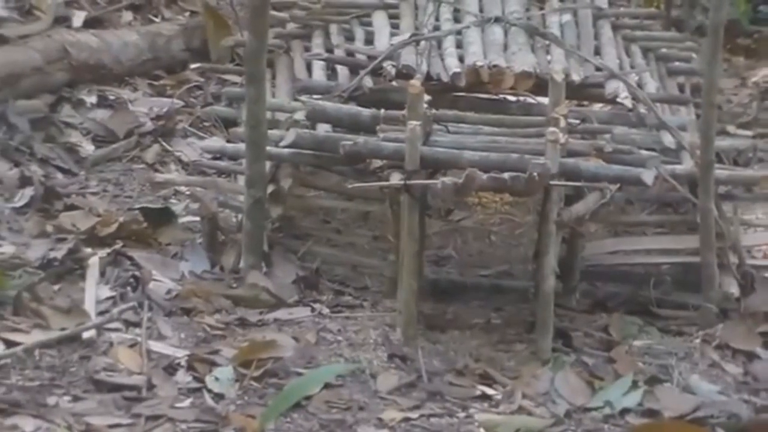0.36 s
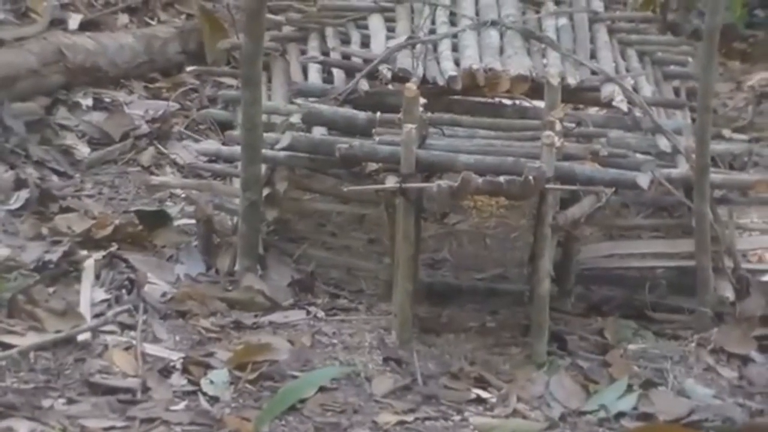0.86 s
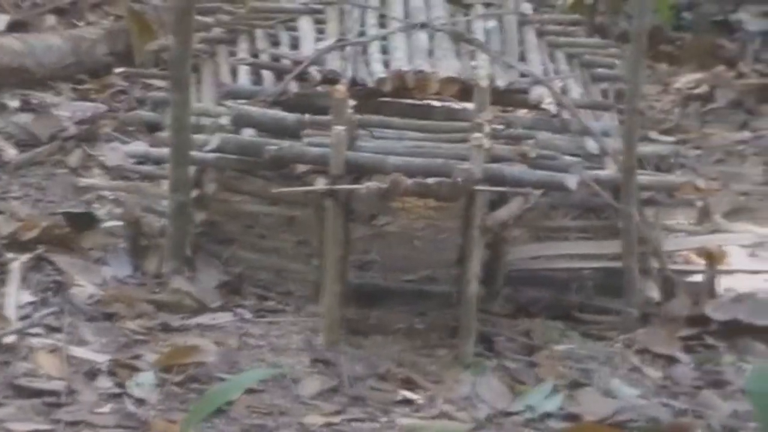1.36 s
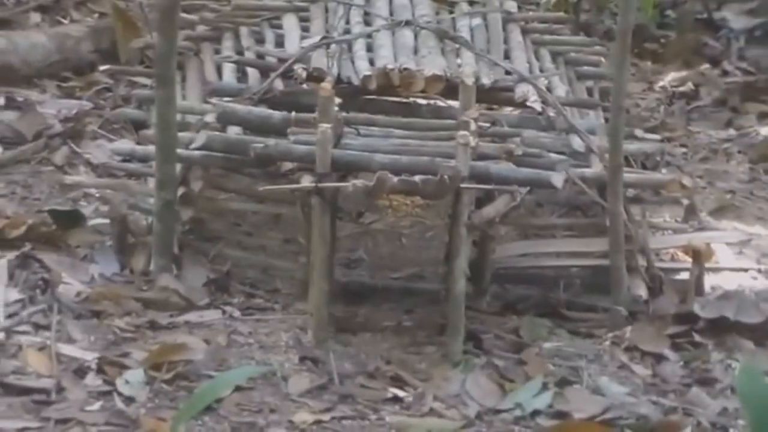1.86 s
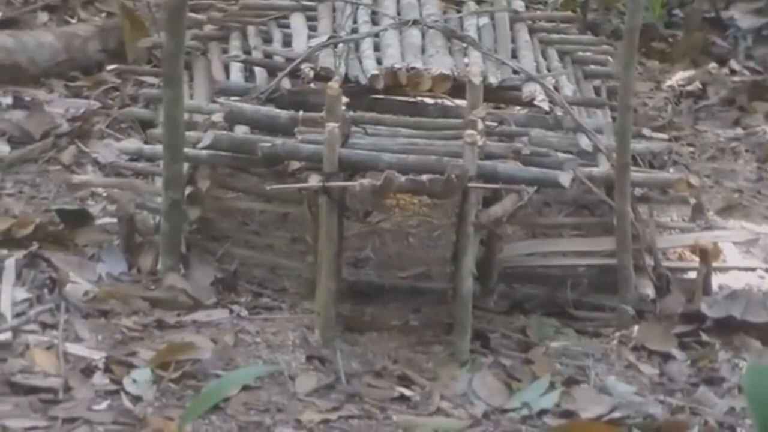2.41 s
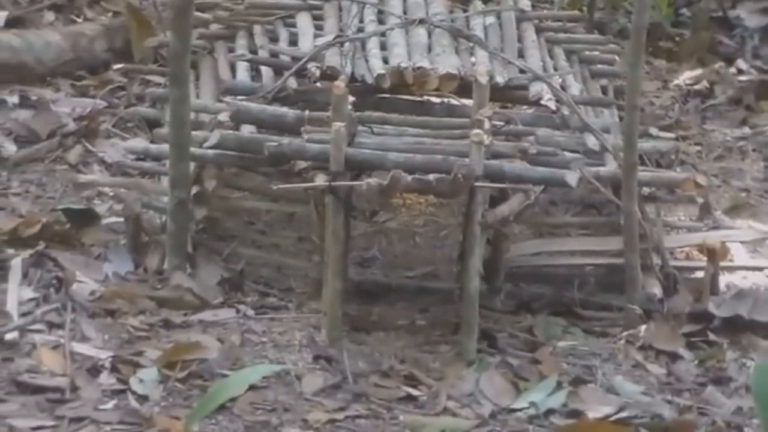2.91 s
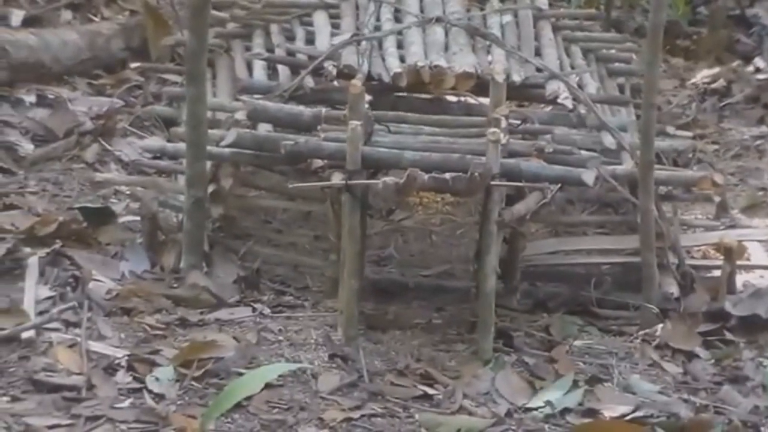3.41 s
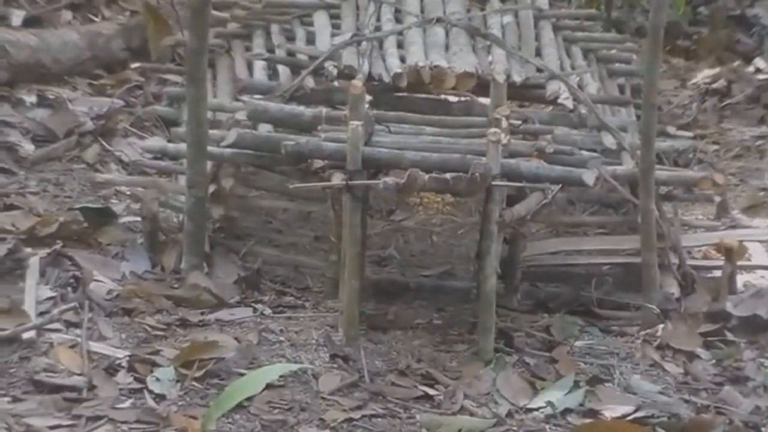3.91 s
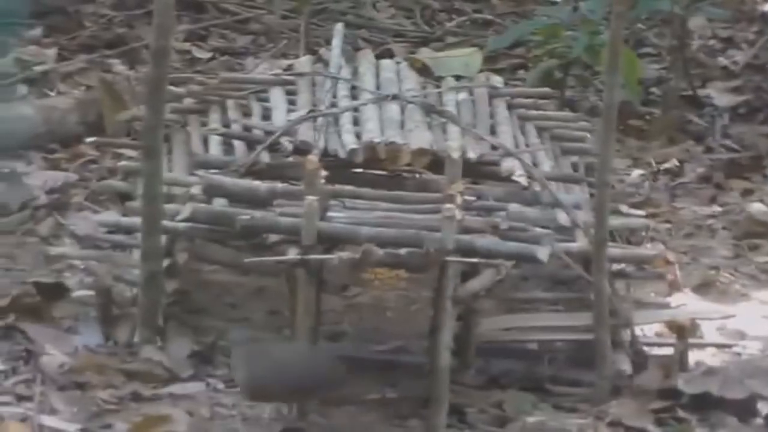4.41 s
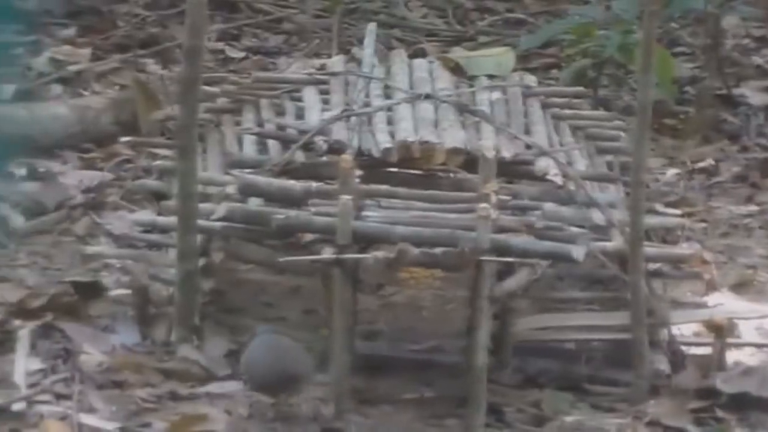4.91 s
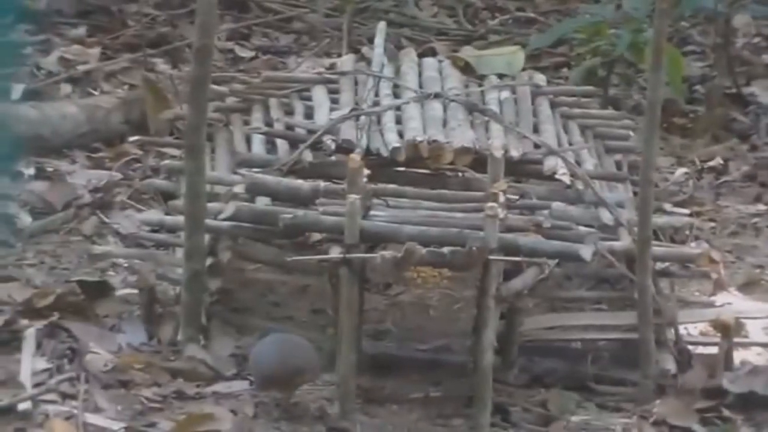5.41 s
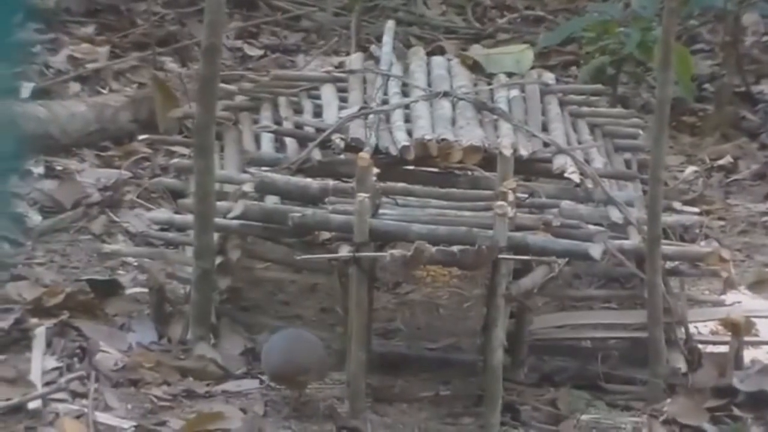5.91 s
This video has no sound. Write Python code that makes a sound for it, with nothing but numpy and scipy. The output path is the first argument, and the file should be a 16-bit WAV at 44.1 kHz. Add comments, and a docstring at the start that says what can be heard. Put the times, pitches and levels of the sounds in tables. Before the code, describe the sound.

A far crowd of cicadas drones steadily at high pitch over airy hiss, with thin cricket trills. Close to the microphone, mostly to the left, a plastic case creaks and snaps in clusters around one and a half to two seconds. Past four seconds a bright click cuts to a louder forest, followed by a hard catch-like clack and scattered dry ticks.

```python
"""A plastic camera case creaks and snaps close to the left port: each blow rings damped modes.
Behind it a far cicada chorus drones as a crowd of clicking drums; crickets and a katydid trill in click trains
over filtered hiss and a wavering low hum. Small dry ticks sound as short resonant bursts.
A splice clicks, and after it the forest is louder."""
import sys
import numpy as np
from scipy import signal
from scipy.fft import rfft, irfft, next_fast_len
from scipy.io import wavfile
from scipy.ndimage import uniform_filter1d, map_coordinates

SR = 44100
rng = np.random.default_rng(int(sys.argv[2]) if len(sys.argv) > 2 else 0)


def master_out(mix):
    """Clip the mix to full scale and print it as 16-bit PCM to the path in sys.argv[1]."""
    frames = np.transpose(np.atleast_2d(mix))
    ceiling = np.clip(frames, -1, 1)
    pcm = np.round(ceiling * 32767).astype(np.int16)
    wavfile.write(sys.argv[1], SR, pcm)


def convert_level_to_amplitude(level_db):
    """Map a level in decibels to its linear amplitude factor."""
    exponent = np.asarray(level_db, float) / 20
    return 10 ** exponent


N = 265967
TIME = np.arange(N) / SR  # s
SPLICE_S = 4.3985
LATE = np.arange(N) >= SPLICE_S * SR  # samples after the splice
OPPOSITE = np.array([[1], [-1]])  # opposite signs at the two ports


def unit(x):
    """Normalisation: scales a signal to rms 1."""
    return x / np.sqrt(np.mean(x ** 2) + 1e-20)


def along(points, hz):
    """Logarithmic frequency scale: interpolates (Hz, value) points."""
    f, v = np.transpose(points)
    return np.interp(np.log(hz + 1), np.log(f + 1), v)


def curve(rows):
    """Linear interpolation: (s, value) rows as one value per sample."""
    return np.interp(TIME, *np.transpose(rows))


def wobble(rate):
    """Slow random modulation: a smooth curve through random knots, rate knots a second."""
    return map_coordinates(rng.standard_normal(int(N * rate / SR) + 4), [np.arange(N) * rate / SR])


def filtered(x, response):
    """Linear filtering: the spectrum of x times a complex response of frequency."""
    m = next_fast_len(x.shape[-1] + 8192)
    spectrum = rfft(x, m) * response(np.fft.rfftfreq(m, 1 / SR))
    return irfft(spectrum, m)[..., :x.shape[-1]]


def ring(hz, centre_hz, width_hz):
    """Resonance: the bandpass response of one damped oscillator."""
    return 1j * hz * width_hz / (centre_hz ** 2 - hz ** 2 + 1j * hz * width_hz)


def add(track, s, sound):
    """Superposition: mixes a stereo sound in at s seconds."""
    k = round(s * SR)
    track[:, k:k + sound.shape[1]] += sound


def clicks(rate, jitter_s, scatter_db):
    """Pulse train: rate clicks a second at each sample, uneven in time and size."""
    at = np.flatnonzero(np.diff(np.floor(np.cumsum(rate) / SR)))
    draw = rng.standard_normal((len(at), 2))
    shift = np.round(jitter_s * SR * draw[:, 0]).astype(int)
    at = np.clip(at + shift, 0, N - 1)
    return np.bincount(at, convert_level_to_amplitude(scatter_db * draw[:, 1]), N)


def foliage(x, t60, wet):
    """Multiple scattering: direct sound plus a separate decaying noise tail for each port."""
    t = np.arange(SR // 2) / SR
    tail = rng.standard_normal((2, len(t))) * convert_level_to_amplitude(-60 * t / t60)
    wet = np.clip(wet, 0, 1)
    scattered = signal.fftconvolve(x[None], tail / np.linalg.norm(tail[0]), axes=1)[:, :N]
    return np.sqrt(1 - wet) * x + np.sqrt(wet) * scattered


def hum():
    """Phase and amplitude modulation: a faint 30 Hz tone wavers, a little differently at each port."""
    apart = 0.57 * wobble(5) * OPPOSITE
    phase = 2 * np.pi * 30 * TIME + 0.32 * wobble(2.76) + apart
    return convert_level_to_amplitude(-57.5 + 1.65 * wobble(6.19)) * np.sqrt(2) * np.sin(phase)


def patchy(x, patch_db):
    """Time-frequency modulation: small random patches of gain."""
    z = signal.stft(x, nperseg=1024)[2]
    field = rng.standard_normal(z.shape[1:])
    field = uniform_filter1d(uniform_filter1d(field, size=5, axis=0), size=4, axis=1)
    return signal.istft(z * convert_level_to_amplitude(patch_db * unit(field)), nperseg=1024)[1][:, :N]


# Hiss of air, leaves and microphone before and after the splice.
# Each row: frequency in Hz, relative spectral density in dB.
HISS_BEFORE = [(8, -2), (20, -2.5), (45, -2), (70, -6.5), (130, -11.5), (250, -14.5), (600, -19),
               (1500, -23), (3000, -23), (5000, -26), (8000, -29), (12000, -33), (15000, -37.5)]
HISS_AFTER = [(8, -4), (20, -10), (45, -5), (70, -2.5), (130, -9), (300, -11), (600, -16.5), (1500, -19.5),
              (3000, -20.5), (5000, -24), (8000, -24.5), (12000, -30.5), (15000, -37)]
# Likeness of the ports. Each row: frequency in Hz, left-right correlation (1 is identical).
PORT_LIKENESS = [(30, 0.41), (200, 0.27), (2000, 0.14), (6000, 0.13), (12000, 0.01)]


def hiss():
    """Partial coherence: mid and side noise are balanced so that the ports are nearly unrelated."""
    def mid_side(hz):
        turn = np.arccos(np.clip(along(PORT_LIKENESS, hz), -1, 1)) / 2
        return np.array([np.cos(turn), np.sin(turn)])

    parts = []
    for spectrum, db in ((HISS_BEFORE, -57.1), (HISS_AFTER, -55)):
        noise = patchy(rng.standard_normal((2, N)), patch_db=1.88)
        mid, side = filtered(noise, lambda hz: convert_level_to_amplitude(along(spectrum, hz)) * mid_side(hz))
        parts.append(convert_level_to_amplitude(db) * unit(np.array([mid + side, mid - side])))
    return np.where(LATE, parts[1], parts[0]) * convert_level_to_amplitude(0.43 * wobble(3.01))


# Cricket phrases. Each row: start in seconds, length in seconds, level in dB before the waver.
PHRASES = [(0.03, 0.46, -76), (.62, .36, -77), (1.087, 0.4, -74.5), (2.077, 0.34, -76), (2.514, 0.37, -75),
           (3.097, 0.43, -77), (3.794, 0.38, -77), (4.4, 0.26, -79), (4.66, 0.39, -69.5), (5.288, .5, -71),
           (5.9, .3, -70)]


def phrases():
    """Amplitude envelope: each cricket phrase swells, holds with a waver and dies."""
    attack_s, release_s, between_db, waver_db = .05, .08, -82, 1.5
    out = np.full(N, convert_level_to_amplitude(between_db))
    for s, length, db in PHRASES:
        swell = (TIME - s) / attack_s
        fall = (s + length - TIME) / release_s + 1
        out += convert_level_to_amplitude(db) * np.clip(np.minimum(swell, fall), 0, 1)
    return out * convert_level_to_amplitude(waver_db * wobble(10))


def crickets():
    """Line spectrum: two steady click rates excite wing resonances, giving combs of thin lines."""
    rates = np.where(LATE, 112.8, 118.85), np.where(LATE, 110.5, 118.87)  # clicks a second
    wings = 0
    for rate, db, hz, width_hz in zip(rates, (0, -10), (7115, 6800), (300, 130)):
        beat = clicks(rate * (1 + .0004 * wobble(4)), 2.2e-5, 3)
        after, before = [unit(filtered(beat, lambda f: ring(f, hz + shift, width_hz) ** 2))
                         for shift in (70, -50)]  # Hz
        wings = wings + convert_level_to_amplitude(db) * np.where(LATE, after, before)
    return phrases() * foliage(wings, t60=0.12, wet=0.75)


def katydid():
    """Stridulation: after the splice a very even click train excites one broad resonance."""
    rasp = clicks(np.full(N, 194.87), 8e-6, 1.3)
    song = unit(filtered(rasp, lambda f: ring(f, 9540, 2000) ** 2))
    return LATE * convert_level_to_amplitude(-71.5 + 0.97 * wobble(3.26)) * foliage(song, t60=0.12, wet=0.9)


# Level of the whole chorus. Each row: time in seconds, level in dB before the background gain.
CHORUS_LEVEL = [(0, -59.5), (1.2, -59.5), (2, -59.5), (4.39, -60.5), (4.4, -54), (5.2, -54.5),
                (6.03, -55.5)]
# The singers' drums. Each row: resonance in Hz, width of one resonator stage in Hz, mean level in dB.
TYMBALS = [(3780, 110, -8.5), (3930, 227, -3), (4055, 176, -4), (4102, 64, -4), (4163, 215, -6),
           (4320, 340, -16)]


def cicadas():
    """Incoherent summation: uneven clicks of buckling drums blur into a drone, partly ahead, partly around."""
    crowd = np.zeros((2, N))
    for hz, width_hz, db in TYMBALS:
        beats = np.array([clicks(np.full(N, 900.), .002, 2.7) * rng.choice([-1, 1], N) for _ in crowd])
        drums = unit(filtered(beats, lambda f: ring(f, hz, width_hz) ** 2))
        crowd += convert_level_to_amplitude(db + 1.3 * wobble(4.18)) * drums
    ahead, around = crowd
    return convert_level_to_amplitude(curve(CHORUS_LEVEL)) * unit(ahead + 0.43 * around * OPPOSITE)


# Brief drops of the background level. Each row: start in seconds, length in seconds, depth in dB.
DIPS = [(1.27, .345, -6), (1.251, 0.012, -16), (1.1, 0.011, -6), (1.655, 0.041, -2.5), (1.692, .007, -11)]


def dips():
    """Gain modulation: soft-edged dips of the background and a steep fade into the splice."""
    edge_s, fade_start_s, fade_step_db, fade_db_per_s = 0.0051, 4.367, -9, -950
    db = 1.5
    for s, length, depth in DIPS:
        inside = np.minimum(TIME - s, s + length - TIME)
        db = db + depth * np.clip(inside / edge_s + .5, 0, 1)
    fading = (TIME > fade_start_s) & (TIME < SPLICE_S)
    return convert_level_to_amplitude(db + fading * (fade_step_db + fade_db_per_s * (TIME - fade_start_s)))


# Small ticks. Each row: time in seconds, peak in dB before panning, pitch in Hz,
# width of the first resonance in Hz, left minus right in dB.
TICKS = [(1.211, -50.5, 1400, 500, 4), (1.639, -32.5, 3980, 3000, 0), (1.724, -32.5, 4300, 3500, 3),
         (1.756, -43, 4500, 3000, 2), (1.887, -42, 2780, 1500, 0), (2.058, -45, 2730, 1200, 1),
         (3.621, -36, 3200, 3980, -7), (4.724, -42, 1060, 90, 4), (4.723, -39, 2270, 700, -3),
         (4.724, -41.5, 3300, 600, -7), (4.908, -41, 1800, 2500, 3), (5.158, -39.5, 1290, 2500, 2),
         (5.219, -42, 1300, 1500, 1.5), (5.249, -44, 2200, 2000, 5), (5.425, -37, 1700, 2800, 7),
         (5.54, -39, 1760, 2800, 7), (5.665, -39, 1600, 2500, 5), (5.88, -40, 497, 1000, -2)]


def dry_ticks():
    """Impulse excitation: a spike and a few crumbs of noise drive two resonances at one pitch."""
    out, t = np.zeros((2, N)), np.arange(SR // 30) / SR
    for s, db, hz, width_hz, pan_db in TICKS:
        shared = 0.23 * rng.standard_normal(len(t)) * convert_level_to_amplitude(-60 * t / 0.012)
        separate = 0.17 * rng.standard_normal((2, len(t))) * convert_level_to_amplitude(-60 * t / 0.025)
        burst = (t == 0) + shared + separate
        tick = filtered(burst, lambda f: ring(f, hz, width_hz) * ring(f, hz, 0.47 * width_hz + 400))
        add(out, s - .0005, convert_level_to_amplitude(db + pan_db / 2 * OPPOSITE) * tick / np.abs(tick).max())
    return out


def splice():
    """Discontinuity: a bright click and a slowly decaying offset, opposite at the two ports."""
    out, t = np.zeros((2, N)), np.arange(SR // 4) / SR
    chirp = 0.65 * filtered(rng.standard_normal((2, len(t))), lambda f: ring(f, 5000, 7600))
    for hz, gain in ((4000, 1), (7400, 0.37), (1200, 0.36)):
        chirp = chirp + gain * np.sin(2 * np.pi * hz * t)
    click = convert_level_to_amplitude(-28.5) * chirp * np.exp(-((t - .0015) / 0.00055) ** 2)
    offset = convert_level_to_amplitude(-35.5) * np.exp(-t / 0.1) * (t > .002) * [[-1], [.8]]
    add(out, SPLICE_S, click + offset)
    return out


def knock(modes, attack, deep_db=0, low_db=0, mid_db=0, high_db=0, damping=1):
    """Modal synthesis: a blow rings damped modes; each varies a little at random in pitch, level and phase."""
    t = np.arange(SR // 8) / SR
    hz, left_db, right_db, t60, turn = np.transpose(modes)[:, :, None]
    group_db = np.select([hz < 200, hz < 450, hz < 700, hz > 1900], [deep_db, low_db, mid_db, high_db])
    level_draw, turn_draw, pitch_draw = rng.standard_normal((3, *hz.shape))
    db = group_db + 1.64 * level_draw - 60 * damping * t / t60
    phase = 2 * np.pi * hz * (1 + 0.011 * pitch_draw) * t
    left = convert_level_to_amplitude(db + left_db) * np.sin(phase)
    right = convert_level_to_amplitude(db + right_db) * np.sin(phase + turn + 0.79 * turn_draw)
    return np.array([left.sum(0), right.sum(0)]) * (1 - np.exp(-(t / attack) ** 2))


def crack():
    """Contact noise: broad noise of a hard contact; the joint fizzes for 3 ms before it lets go."""
    t = np.arange(SR // 8) / SR - .003
    decay = convert_level_to_amplitude(-60 * t / 0.02) + convert_level_to_amplitude(-4.5 - 60 * t / 0.012)
    shape = np.where(t < 0, convert_level_to_amplitude(-14 + 1300 * t), decay)
    noise = rng.standard_normal((2, len(t))) * shape * convert_level_to_amplitude([[3], [0]])  # left 3 dB stronger
    return filtered(noise, lambda f: ring(f, 2000, 4500) * ring(f, 2900, 4160) / (1 + 1j * f / 7000))


# The catch closes and bounces. Each row: time in seconds, gain in dB, crack relative to it in dB.
LATCHINGS = [(4.4659, -17.5, -6), (4.4699, -30.5, -3)]
# Modes of the catch on the case. Each row: mean frequency in Hz, mean left level in dB, mean right level
# in dB, 60 dB decay time in seconds, mean phase lead of the right port in rad.
CATCH_MODES = [(246, -15, -14, 0.029, .8), (353, -8.5, -10, 0.032, 1.1), (505, 0.5, -7.5, 0.027, 0.61),
               (834, -3, -9.5, 0.075, 2.66), (1210, 1.5, -11, 0.012, 1.3), (1700, -2.5, -12, 0.015, 0.75),
               (2200, -8, -11, 0.021, 1.4), (2554, 4.5, 2, 0.012, 0.61), (3300, -14, -11, 0.0067, 2.4),
               (4500, -20, -13, 0.0059, .9), (5820, -9, -2.5, 0.0076, 0.84)]


def catch():
    """Impact: the closing catch rings its modes and cracks."""
    out = np.zeros((2, N))
    for s, db, crack_db in LATCHINGS:
        add(out, s, convert_level_to_amplitude(db) * knock(CATCH_MODES, attack=0.00077))
        add(out, s - .003, convert_level_to_amplitude(db + crack_db) * crack())
    return out


# Stick-slip creaks. Each row: time in seconds, peak in dB.
SLIPS = [(0.733, -25.5), (1.361, -42.5), (1.48, -34), (1.502, -31.5), (1.521, -33), (1.533, -41),
         (1.546, -30.5), (1.561, -31.5), (1.57, -34.5), (1.578, -36), (1.587, -43), (1.7188, -26),
         (1.73, -25), (1.765, -24), (1.799, -23.5), (1.812, -27.5), (1.826, -28.5), (1.847, -24),
         (1.861, -29.5), (1.877, -29.5), (1.888, -34), (1.896, -30), (1.902, -31), (1.91, -36),
         (2.166, -25.5)]
# Modes of the plastic case, for creaks and snaps. Each row: mean frequency in Hz, left level in dB and
# right level in dB before each blow's weighting, 60 dB decay time in seconds before any added damping,
# mean phase lead of the right port in rad.
CASE_MODES = [(147.4, -20.5, -26.5, 0.085, 0.16), (253, -19, -13.5, 0.0091, 1.44),
              (390, -15, -15.5, 0.045, 0.67), (558, -6, -8.5, 0.018, 1.1), (660, -16.5, -17.5, 0.024, 1.8),
              (834, -9.5, -22, 0.059, 2.15), (947, -4, -23, 0.024, 1.6), (1041, -1, -16, 0.031, 2.1),
              (1236, -10, -13.5, 0.013, 0.64), (1400, -16, -21.5, 0.034, 2.4),
              (1647, -13, -17.5, 0.023, 0.47), (2090, 4, -7, 0.0067, 1.4), (2794, -10, -8.5, 0.02, 0.37),
              (3200, -12, -10, 0.019, 0.39), (3990, -21, -11, 0.021, 0.86), (4860, -6, -11.5, 0.017, 3.8),
              (6320, -5, -4, 0.01, 2.3), (7400, -36, -23, 0.015, 0.67)]


def creaks():
    """Stick-slip friction: soft slips ring mostly the lower modes of the case."""
    out = np.zeros((2, N))
    for s, db in SLIPS:
        slip = knock(CASE_MODES, attack=0.00075, deep_db=1.5, low_db=-4, mid_db=-5.0, high_db=-25,
                     damping=1.14)
        add(out, s - .0003, convert_level_to_amplitude(db) * slip / np.abs(slip).max())
    return out


# Hard snaps of the case. Each row: time in seconds, gain in dB, weight of modes from 200 to 450 Hz in dB,
# weight of modes from 450 to 700 Hz in dB, rise time constant in seconds.
SNAPS = [(1.2674, -14, 4, -9, 0.00026), (1.6173, -14, -2, 3, .001), (1.6219, -22.5, -5.5, 1.5, 0.00089),
         (1.7036, -14, -2, 3.5, .0008), (1.7075, -22.5, -8, -5, 0.0004)]


def snaps():
    """Sudden release: a hard snap rings all modes and cracks, the weaker the slower its rise."""
    out = np.zeros((2, N))
    for s, db, low_db, mid_db, rise in SNAPS:
        add(out, s, convert_level_to_amplitude(db) * knock(CASE_MODES, rise, -3.5, low_db, mid_db, -9.5))
        crack_db = -5.5 - 9000 * rise  # loses 9 dB per ms of rise
        add(out, s - .003, convert_level_to_amplitude(db + crack_db) * crack())
    return out


def scene():
    """Superposition: the background with its dips, and the near sounds on top."""
    background = hum() + hiss() + crickets() + katydid() + cicadas()
    return dips() * background + dry_ticks() + splice() + catch() + creaks() + snaps()


def band_limit(x):
    """A steep low-pass at the top of the band."""
    return signal.sosfilt(signal.butter(12, 15540, fs=SR, output="sos"), x)


def record(dry):
    """Low-pass filtering: a steep low-pass above about 14.2 kHz dulls the top treble."""
    dull = filtered(dry, lambda hz: np.clip((14450 - hz) / 300, convert_level_to_amplitude(-30), 1))
    return band_limit(dull)


dry = scene()
out = record(dry)
master_out(out)
```